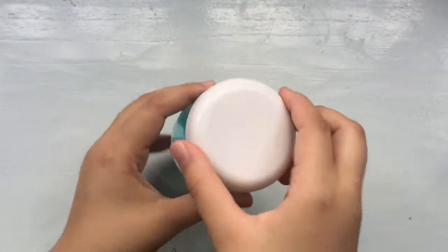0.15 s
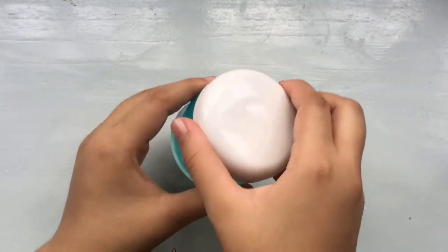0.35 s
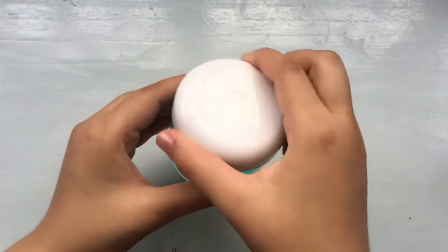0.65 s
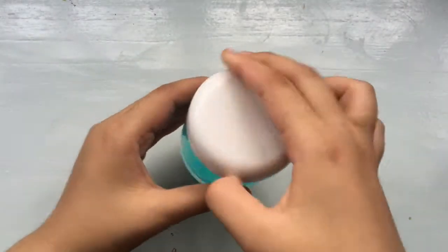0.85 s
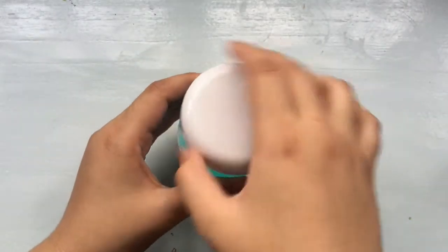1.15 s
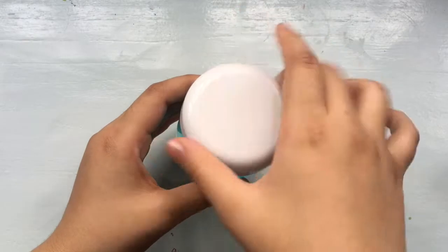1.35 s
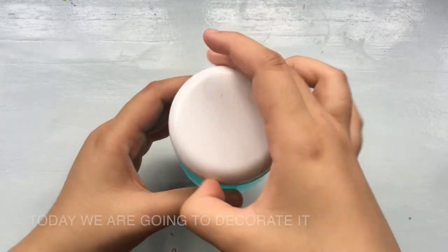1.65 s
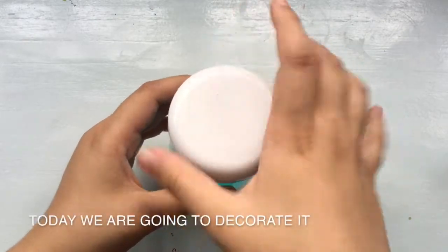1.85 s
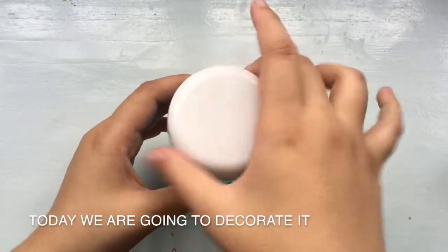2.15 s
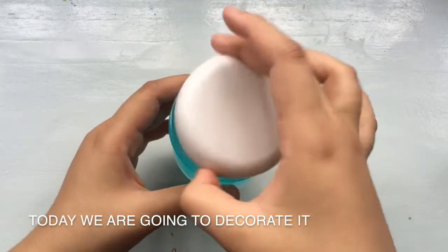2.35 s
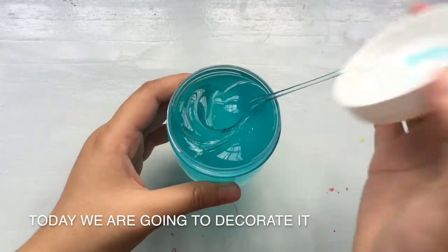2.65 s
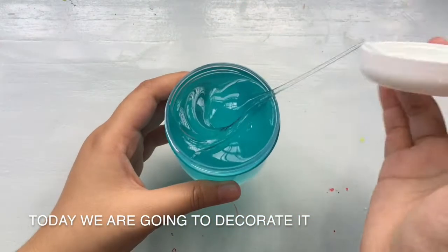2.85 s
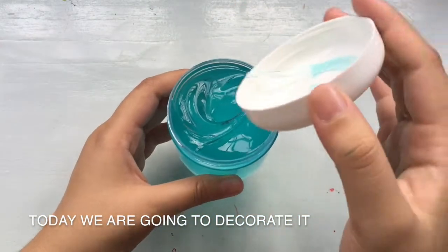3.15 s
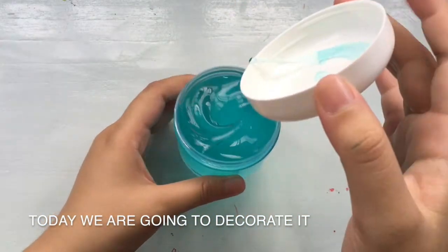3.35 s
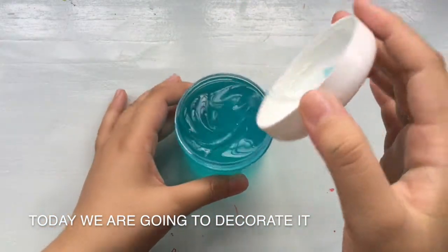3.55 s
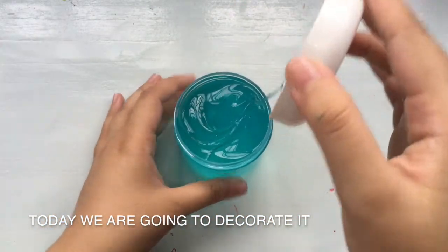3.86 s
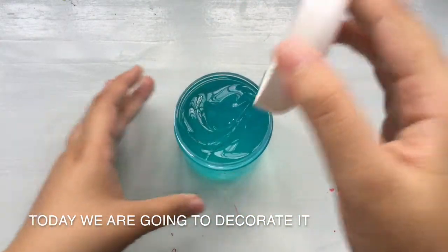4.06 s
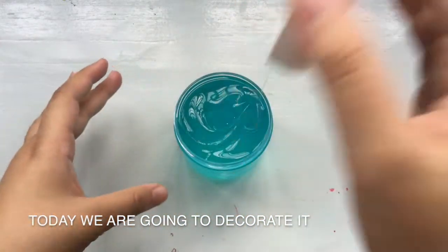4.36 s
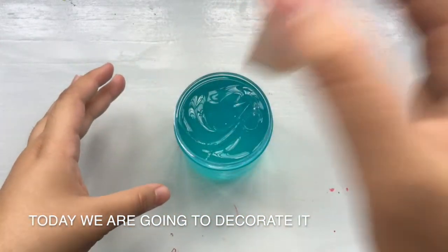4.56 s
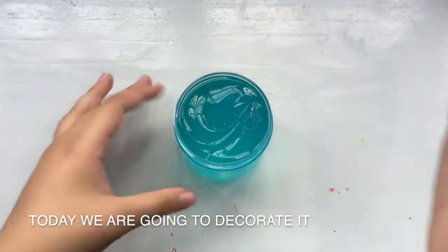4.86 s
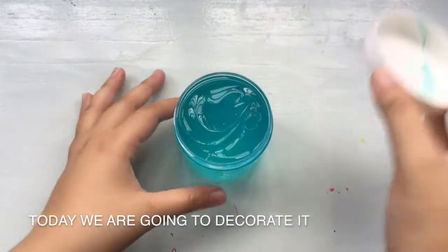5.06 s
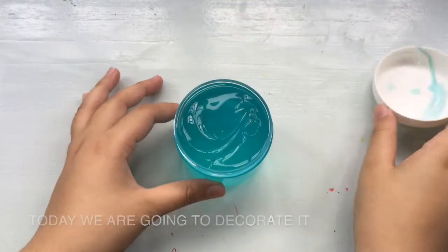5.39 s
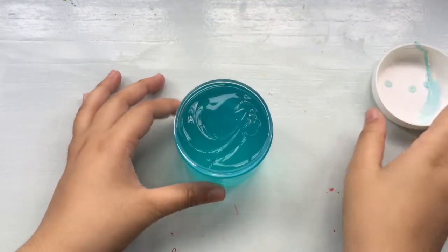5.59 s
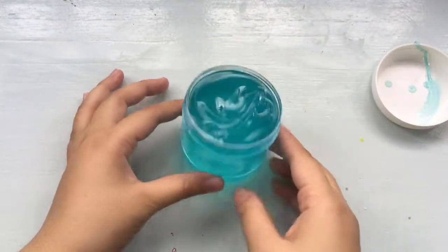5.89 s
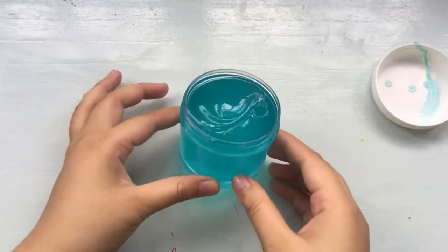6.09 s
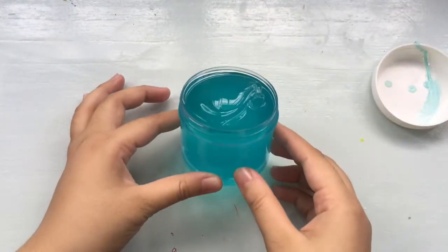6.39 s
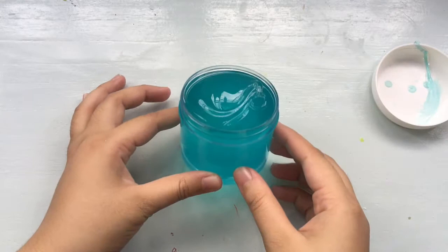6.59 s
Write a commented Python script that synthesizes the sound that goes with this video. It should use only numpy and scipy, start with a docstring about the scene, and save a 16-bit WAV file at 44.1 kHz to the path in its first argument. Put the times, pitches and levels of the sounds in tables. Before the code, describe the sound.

Close to the microphone in a small quiet room, a plastic screw lid is twisted off a jar with uneven dry ticks, faint rubbing and tiny squeaks. After a pause the jar bumps down on a wooden table with a strong hollow thud, then a weaker one. Later the lid clacks lightly onto the table, and the jar gives a last soft thump. A deep steady motor hum and faint hiss continue throughout.

```python
"""Twisting a lid off a small jar

A plastic screw lid is twisted off in a few turns, the jar bumps down on a wooden table, the lid is laid aside.
Ticks, rubs and squeaks are short clicks and noise; the clicks and rubs ring the tones of the lid.
Each bump rings the table top and the jar wall, with a dull thud of noise. A short noise tail adds the room.
A motor hums far off as steady tones, over the rumble and hiss of a quiet room made from filtered noise.
"""
import sys
import numpy as np
from scipy import signal
from scipy.fft import rfft, irfft, next_fast_len
from scipy.io import wavfile

SR = 44100
rng = np.random.default_rng(int(sys.argv[2]) if len(sys.argv) > 2 else 0)


def output_pcm(signal):
    """Save a mono or channel-first signal as 16-bit PCM at the path in sys.argv[1].

    Samples are clipped to [-1, 1] before scaling.
    """
    pcm = np.clip(np.atleast_2d(signal).T, -1, 1) * 32767
    wavfile.write(sys.argv[1], SR, np.round(pcm).astype(np.int16))


N = 296793   # length in samples


def amp(db):
    """Turn decibels into a gain."""
    return 10 ** (np.asarray(db) / 20)


def rms_one(x):
    """Scale a sound to an average strength (rms) of 1."""
    return x / np.sqrt(np.mean(x ** 2) + 1e-20)


def at_hz(points, hz):
    """Read a curve of (pitch_hz, level_db) points on a log-frequency axis."""
    point_hz, point_db = np.array(points).T
    return np.interp(np.log(hz), np.log(point_hz), point_db)


def ring(force, hz, t60):
    """One tone of an object: a unit click starts a sine of height 1 that falls by 60 dB in t60 seconds."""
    shrink = amp(-60 / (t60 * SR))   # per sample
    turn = 2 * np.pi * hz / SR       # radians per sample
    # the tiny offset keeps the filter from slowing down on near-zero numbers
    return signal.lfilter([0, np.sin(turn)], [1, -2 * shrink * np.cos(turn), shrink ** 2], force + 1e-18)


def body(force, modes, colour=((100, 0), (20000, 0)), neighbour=-1):
    """All tones of an object driven by one force; each is multiplied by one more factor of neighbour."""
    total = 0
    for k, (hz, db, t60) in enumerate(modes):
        gain = neighbour ** k * amp(db + at_hz(colour, hz))
        total = total + gain * ring(force, hz, t60)
    return total


def add_sound(out, start_s, sound):
    """Mix a sound in at a time, cut at the end of the scene."""
    i = round(start_s * SR)
    out[i:i + len(sound)] += sound[:N - i]


def add_peak(out, start_s, sound, peak_db):
    """Mix a sound in at a time with a given peak."""
    add_sound(out, start_s, amp(peak_db) * sound / np.max(np.abs(sound)))


def stroke(t, length_s, power):
    """A touch that swells and fades once; a smaller power makes its edges steeper."""
    return np.sin(np.pi * np.clip(t / length_s, 0, 1)) ** power


def lid_colour(hollow_db, bright_db, top_db):
    """Where and how the lid is touched weights its low, high and highest tones."""
    return [(900, hollow_db), (2500, 0), (6500, bright_db), (12000, top_db)]


# tones of the plastic lid: pitch_hz [Hz], relative level_db [dB], time to fall 60 dB t60_s [s]
LID_MODES = [(370, -9.5, 0.032), (659, 0, 0.014), (803, -1.5, 0.028), (860, 4, 0.013), (979, 4, 0.015),
             (1310, 4, 0.006), (1610, -1.5, 0.021), (1710, 1, 0.0081), (2070, -2, 0.0077),
             (2285, -7, 0.025), (2520, -4.5, 0.0071), (2980, -5.5, 0.01), (3285, -1.5, 0.0067),
             (3870, 2, 0.0035), (4500, -4, 0.0048), (5530, -1, 0.0035), (5655, -5, 0.0089),
             (6270, -5, 0.0038), (7040, 0, 0.0016), (8700, 1.5, 0.0014), (11500, 0, 0.00071),
             (14300, -4, 0.00091)]
# lid ticks on thread and table: start_s [s], peak_db [dB], hollow_db and bright_db (low and high tones) [dB],
# chatter_s (fading time) [s], snap_hz [Hz], snap_db (against the lid's ring) [dB]
LID_TICKS = [(0.814, -54, -15, 5, 0.003, 3600, -6), (0.9308, -30.5, -9, -15, 0.0007, 4130, -2),
             (0.996, -45, 16, -3, 0.0023, 900, -2), (1.0512, -37, 1, -9, 0.0045, 1270, 1),
             (1.058, -40, 10, 7, 0.0025, 950, 5), (1.0698, -33.5, 4, -5, 0.0018, 1680, 6.5),
             (1.174, -45.5, 13, 0, 0.0025, 3300, 1), (1.1996, -22.5, -9, 2.5, 0.0027, 1810, 9),
             (1.32, -40, 11, 7, 0.0032, 1000, -2), (1.3262, -30.5, -8, -2, 0.0024, 1700, 11),
             (1.3278, -31, -8, 1, 0.0017, 940, 6), (1.416, -48, 10, 4, 0.0033, 1200, -4),
             (1.426, -36, 3, 1.5, 0.0015, 8000, 7), (1.4268, -23, 4.5, 3.5, 0.0014, 1300, 4.5),
             (1.4487, -30.5, -14, -4, 0.0013, 2450, 13), (1.4574, -35.5, 14, 8.5, 0.0028, 900, -16),
             (1.728, -52, 5, 18, 0.0029, 3600, -2), (1.78, -46.5, 24, 1, 0.0024, 790, 8),
             (1.9902, -35.5, -2, -7, 0.0012, 1290, 6), (2.11, -46.5, 5, -7, 0.0037, 900, 1),
             (2.22, -48.5, -5, 6, 0.0031, 8000, -12), (2.2214, -38.5, 8, -5, 0.0025, 900, -13),
             (2.2648, -35, 23, 13, .0019, 764, 9), (2.267, -40.5, -2, 3, 0.0048, 910, -8),
             (2.366, -39, -2, 4, 0.0017, 6000, -2), (4.445, -58, 2, 5.5, .0033, 6000, -9),
             (5.333, -47.5, 9, 6, 0.004, 1800, 0), (5.3729, -20.5, -2, -2, 0.00051, 2300, 6),
             (5.38, -49, 9, -9, 0.0043, 1500, -3), (5.5699, -27, -4, -2.5, 0.0012, 2000, -0.5),
             (5.574, -32, 18, 7, 0.0032, 890, 3.5)]
CHATTER_SHARE = 0.23   # strength of the chatter against the first touch
# highest tones: level for a plain tick, and dB gained per dB of the bright part
TICK_TOP_DB, TOP_FOLLOWS = -9.5, 3.2
SNAP_CYCLES = 9.9      # a snap falls by 60 dB within this many swings


def ticks():
    """Each tick is a sudden snap with a pitch of its own, plus a click and dying chatter that ring the lid."""
    out, t = np.zeros(N), np.arange(4096) / SR
    click = (t == 0).astype(float)
    chatter = rng.standard_normal((len(LID_TICKS), len(t)))
    # light touches hardly move the low tones
    chatter = signal.lfilter(*signal.butter(1, 600, "high", fs=SR), chatter)
    for tick, noise in zip(LID_TICKS, chatter):
        start_s, peak_db, hollow_db, bright_db, chatter_s, snap_hz, snap_db = tick
        force = click + CHATTER_SHARE * noise * np.exp(-t / chatter_s)
        force[0] = 1 + CHATTER_SHARE * noise[0]
        colour = lid_colour(hollow_db, bright_db, TICK_TOP_DB + TOP_FOLLOWS * bright_db)
        lid = body(force, LID_MODES, colour)
        snap = amp(snap_db) * ring(click, snap_hz, SNAP_CYCLES / snap_hz)
        add_peak(out, start_s, lid / np.max(np.abs(lid)) + snap, peak_db)
    return out


# thread, fingers or table rub along the lid: start_s [s], length_s [s],
# level_db (before the swell) [dB], hollow_db and bright_db (low and high tones) [dB]
LID_RUBS = [(0.548, 0.22, -75.5, -8, 8), (0.702, 0.28, -67, 0, 3.5), (0.628, 0.06, -64, -9, 0),
            (0.85, 0.04, -56.5, 15, 7), (0.888, 0.028, -58, -12, 0), (0.984, 0.044, -63, -4, -2),
            (1.184, 0.064, -51, 2.5, -5), (1.236, 0.047, -48.5, -8, -1), (1.436, 0.057, -62.5, -21, 3),
            (1.572, 0.13, -67, 8, 10), (1.71, 0.065, -71, -13, 5), (1.783, 0.028, -60, 1, 1.5),
            (1.994, 0.035, -52, -2.5, -2.5), (2.022, 0.055, -55, -2.5, 0), (2.1, 0.031, -57.5, 12, 4),
            (2.224, 0.14, -69, 6, 11), (2.357, 0.039, -53.5, 10, 6), (2.368, 0.016, -52.5, -21, 3),
            (3.837, 0.114, -78, -17, 7), (5.347, 0.064, -52.5, 6, -9), (5.368, 0.038, -46.5, 7, -5),
            (5.382, 0.13, -57.5, 5.5, -7), (5.467, 0.041, -67, 17, 12), (5.569, 0.016, -60, 10, 11),
            (5.764, 0.23, -70, 10, 7.5), (5.81, 0.044, -74.5, -17, 18)]
RUB_TOP_DB = 4   # highest tones against the bright part


def rubs():
    """Dense uneven slips come in clumps, swell and fade within each stroke and ring the lid."""
    out, t = np.zeros(N), np.arange(SR // 2) / SR
    fast_filter = signal.butter(2, 120, fs=SR)
    slow_filter = signal.butter(2, 25, fs=SR)
    draws = rng.random((len(LID_RUBS), 4, len(t)))
    for rub, (chance, size, sign, grip) in zip(LID_RUBS, draws):
        start_s, length_s, level_db, hollow_db, bright_db = rub
        fast_clumps = rms_one(signal.lfilter(*fast_filter, grip - 0.5))
        slow_flutter = rms_one(signal.lfilter(*slow_filter, grip[::-1] - 0.5))
        clumps = amp(0.7 * fast_clumps + 1.5 * slow_flutter)
        happens = chance < 5500 / SR   # about 5500 slips per second
        slip_size = amp(-3.5 * np.log(np.maximum(size, 0.01)))   # many small, few large
        slips = clumps * happens * slip_size * np.sign(sign - 0.5)
        colour = lid_colour(hollow_db, bright_db, bright_db + RUB_TOP_DB)
        sound = body(stroke(t, length_s, 0.4) * slips, LID_MODES, colour)
        steady = body(slips, LID_MODES, colour)   # without the swell, to set the level
        add_sound(out, start_s, amp(level_db) * sound / np.std(steady))
    return out


# the plastic binds on the thread and squeaks: start_s [s], length_s [s],
# level_db (before the swell) [dB], centre_hz [Hz]
LID_SQUEAKS = [(0.86, 0.046, -66, 3260), (1.243, 0.028, -45.5, 2550), (1.244, 0.03, -52, 5300),
               (1.245, .026, -53.5, 8900), (1.3245, 0.0065, -44.5, 3950), (1.997, .019, -51.5, 1440),
               (2.023, 0.043, -60, 6200), (5.372, 0.0085, -43.5, 3360), (5.374, 0.078, -74, 5530)]
SQUEAK_WIDTH = 0.2   # width of the resonance as a share of its centre


def squeaks():
    """Fast slips favour one broad resonance while the plastic binds."""
    out, t = np.zeros(N), np.arange(4096) / SR
    noises = rng.standard_normal((len(LID_SQUEAKS), len(t)))
    for (start_s, length_s, level_db, centre_hz), noise in zip(LID_SQUEAKS, noises):
        edges_hz = [centre_hz * (1 - SQUEAK_WIDTH / 2), centre_hz * (1 + SQUEAK_WIDTH / 2)]
        resonance = signal.butter(2, edges_hz, "band", fs=SR, output="sos")
        slips = noise * abs(noise)   # large slips stand out more
        squeak = rms_one(signal.sosfilt(resonance, slips)) * stroke(t, length_s, 0.27)
        add_sound(out, start_s, amp(level_db) * squeak)
    return out


# jar meets the table: start_s [s], peak_db of the table's ring [dB], hardness as contact cut-off hard_hz [Hz],
# thud_db (peak) [dB], crack_db (peak) [dB], treble_db of the crack [dB]
JAR_BUMPS = [(3.5636, -12, 1490, -22.5, -20, -1.5), (3.7374, -23, 1110, -34.5, -36, -5.5),
             (6.264, -31.5, 334, -53.5, -60, -10)]
# tones of the table top: pitch_hz [Hz], relative level_db [dB], t60_s [s]
TABLE_MODES = [(147, -19, 0.62), (198.3, 0, 0.32), (259.3, -9.5, 0.26), (380, -3.5, 0.041), (436, -8, 0.12),
               (493, -4, 0.071), (551, 1.5, 0.03), (635.5, -10.5, 0.14), (695, -5.5, 0.07)]
# tones of the jar wall: pitch_hz [Hz], relative level_db [dB], t60_s [s]
JAR_MODES = [(820, -3, 0.024), (1065, 1.5, 0.019), (1420, -10, 0.0043), (1546, 3.5, 0.018),
             (2030, -1.5, 0.0093), (2260, -4.5, 0.018), (3060, -3, .005), (3570, -1, 0.01),
             (4160, -13, 0.0085), (4460, -10.5, 0.007), (5770, -4.5, 0.012), (6140, -5, 0.0042),
             (8500, -6.5, 0.0016), (12300, -11, 0.0012)]
PUSH_LAG_S = 0.001563   # the table answers just after the jar wall


def bumps():
    """The jar's foot pushes the table top into ringing, with a dull thud and a crack of the jar wall."""
    out, t = np.zeros(N), np.arange(SR // 2) / SR
    click = (t == 0).astype(float)
    thud_band = signal.butter(2, [150, 1300], "band", fs=SR)
    grit = rng.standard_normal((len(JAR_BUMPS), 2, len(t)))
    for bump, (thud_noise, crack_noise) in zip(JAR_BUMPS, grit):
        start_s, peak_db, hard_hz, thud_db, crack_db, treble_db = bump
        contact = signal.butter(2, hard_hz, fs=SR)   # a softer contact is duller
        push = signal.lfilter(*contact, click)
        add_peak(out, start_s + PUSH_LAG_S, body(push, TABLE_MODES, neighbour=0.93), peak_db)
        thud = signal.lfilter(*thud_band, thud_noise * np.exp(-t / 0.0067))
        add_peak(out, start_s, signal.lfilter(*contact, thud), thud_db)
        rattle = click + 0.12 * crack_noise * np.exp(-t / 0.0051)
        crack = body(rattle, JAR_MODES, [(4000, 0), (5000, treble_db)])
        add_peak(out, start_s, crack, crack_db)
    return out


LID_DOWN_S = 5.3        # from here on the lid lies on the table
LID_ON_TABLE_DB = -35   # how much of the lid's sound reaches the table top


def table_under_lid(lid):
    """Once laid down, the lid also shakes the table top."""
    on_table = lid * (np.arange(N) / SR > LID_DOWN_S)
    return amp(LID_ON_TABLE_DB) * body(on_table, TABLE_MODES, [(200, -3), (600, -8.5)])


# times to fall 60 dB [s], level [dB], split between dull and treble [Hz]
ROOM_T60_S, TREBLE_T60_S, ROOM_DB, WALL_CUT_HZ = 0.33, 0.091, -13, 2300


def room(x):
    """Dense reflections: noise that sets in within 0.58 ms and dies faster in the treble."""
    t = np.arange(SR) / SR
    noise = rng.standard_normal(SR)
    dull = signal.lfilter(*signal.butter(1, WALL_CUT_HZ, fs=SR), noise)
    treble = noise - dull
    tail = dull * amp(-60 * t / ROOM_T60_S) + treble * amp(-60 * t / TREBLE_T60_S)
    tail *= np.clip(t / 0.00058, 0, 1)
    return amp(ROOM_DB) * signal.fftconvolve(x, tail / np.linalg.norm(tail))[:N]


# far motor: pitch_hz [Hz], level_db [dB], waver_db (rms) [dB]
MOTOR_HUM = (48.08, -41.5, 0.36)
# overtones of the motor: multiple of the pitch [-], level_db [dB]
MOTOR_OVERTONES = [(2, -64), (3, -72)]
# a second far tone swells in: pitch_hz [Hz], then a list of start_s [s], level_db [dB]
SECOND_TONE = (107.5, [(0, -82.5), (4.3, -86), (4.9, -55.5), (6.73, -56.5)])


def far_tones():
    """A far motor hums with a slowly wavering level; a second far tone wavers more and swells in."""
    t = np.arange(N) / SR
    hz, level_db, waver_db = MOTOR_HUM
    slow = signal.butter(2, 2.5, fs=SR, output="sos")
    waver = rms_one(signal.sosfilt(slow, rng.standard_normal(N + SR))[SR:])
    # the square root of 2 makes each level an rms level
    tones = np.sqrt(2) * amp(level_db + waver_db * waver) * np.cos(2 * np.pi * hz * t)
    for k, db in MOTOR_OVERTONES:
        tones += np.sqrt(2) * amp(db) * (-1) ** (k + 1) * np.cos(2 * np.pi * k * hz * t)
    second_hz, swell = SECOND_TONE
    swell_db = np.interp(t, *np.transpose(swell)) + 1.5 * waver[::-1]
    return tones + np.sqrt(2) * amp(swell_db) * np.sin(2 * np.pi * second_hz * t)


# room and table resonances that the rumble keeps ringing: pitch_hz [Hz], width_hz [Hz], level_db (rms) [dB]
RUMBLE_TONES = [(76.2, 7.1, -60), (86.8, 6, -64), (100.2, 8.2, -59.5), (145.6, 4.1, -61), (199.2, 7, -62.5),
                (243.7, 24, -66), (324.6, 5.8, -71)]


def rumble():
    """Steady noise keeps a few low resonances ringing; a narrower one rings longer."""
    white = rng.standard_normal(N + SR)   # the first second is run-in
    total = np.zeros(N)
    for hz, width_hz, level_db in RUMBLE_TONES:
        t60_s = np.log(1000) / (np.pi * width_hz)
        total += amp(level_db) * rms_one(ring(white, hz, t60_s)[SR:])
    return total


# spectrum of the room noise: pitch_hz [Hz], relative level_db in each Hz [dB]
AIR_SPECTRUM = [(30, -49), (42, -26), (56, -16.5), (75, -1), (120, -18.5), (200, -19), (320, -15),
                (430, -25), (1000, -25.5), (1500, -29), (2500, -37.5), (4900, -48), (10000, -54.5),
                (14500, -55.5), (16000, -61)]
AIR_DB = -56   # rms level of the whole noise


def air():
    """Broad room noise: steady white noise shaped by a spectrum."""
    size = next_fast_len(N)
    hz = np.maximum(np.fft.rfftfreq(size, 1 / SR), 1)
    shaped = rfft(rng.standard_normal(size)) * amp(at_hz(AIR_SPECTRUM, hz))
    return amp(AIR_DB) * rms_one(irfft(shaped, size)[:N])


def scene():
    """Lid, jar and table in the room, over the background."""
    lid = ticks() + rubs() + squeaks()
    near = lid + table_under_lid(lid) + bumps()
    background = far_tones() + rumble() + air()
    return (near + room(near) + background)[None]


CUTOFF_HZ = 16500   # almost nothing is left above this


def record(dry):
    """The deepest bass rolls off and the top is cut steeply."""
    # a mirrored lead lets the filters settle before the start
    lead = np.concatenate([dry[:, SR // 4:0:-1], dry], axis=1)
    lean = signal.sosfilt(signal.butter(4, 36, "high", fs=SR, output="sos"), lead)
    top_cut = signal.cheby2(16, 60, CUTOFF_HZ, fs=SR, output="sos")
    return signal.sosfilt(top_cut, lean)[:, SR // 4:]


dry = scene()
out = record(dry)
output_pcm(out)
```